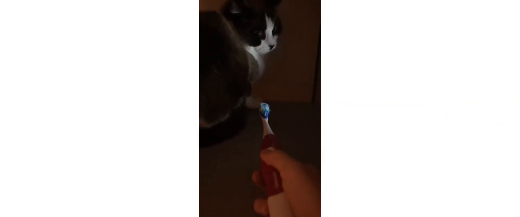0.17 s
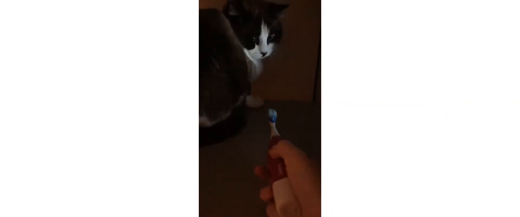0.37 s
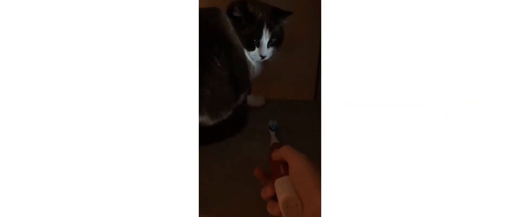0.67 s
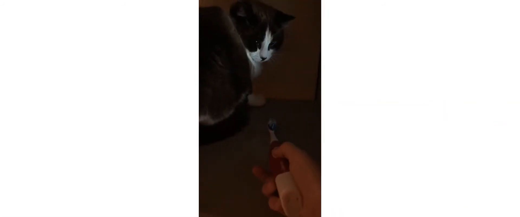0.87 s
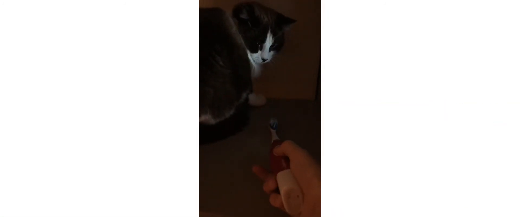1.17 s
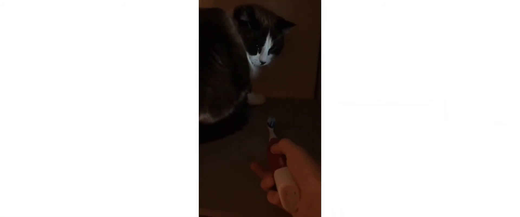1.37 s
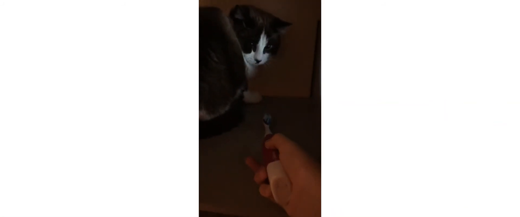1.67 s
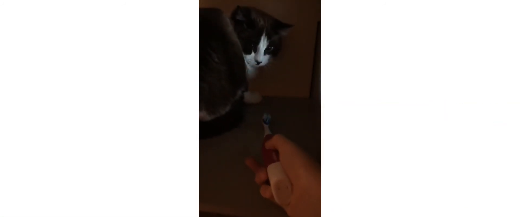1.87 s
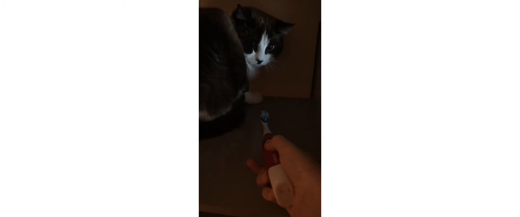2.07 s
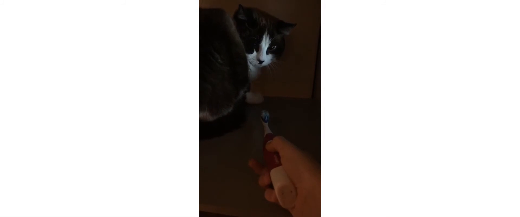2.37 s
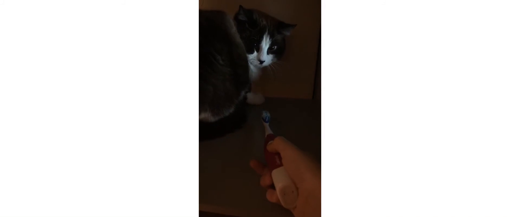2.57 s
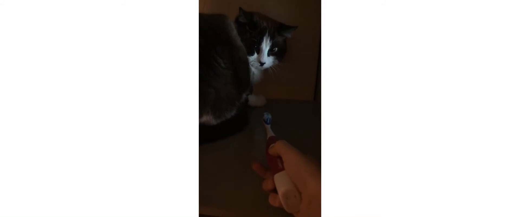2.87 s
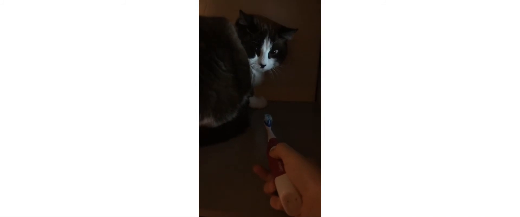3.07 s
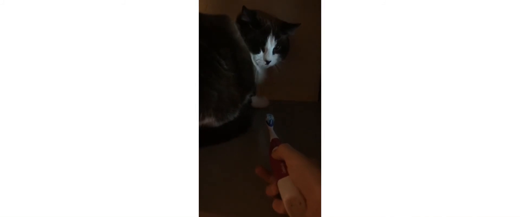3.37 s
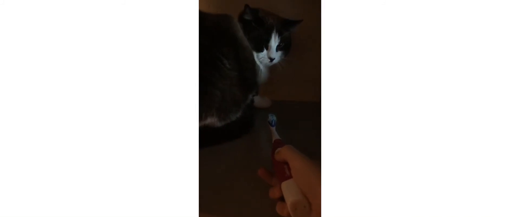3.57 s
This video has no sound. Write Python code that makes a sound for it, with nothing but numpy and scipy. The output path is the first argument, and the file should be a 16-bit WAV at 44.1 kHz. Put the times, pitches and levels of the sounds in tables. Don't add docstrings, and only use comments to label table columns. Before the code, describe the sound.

An electric toothbrush is running from 0 to about 3.7 seconds without stopping. Hard plastic knocks, about 57 swings a second, fuse into a bright, raspy buzz with gritty gear noise and motor whirr, with little bass. Tone shifts as the hand turns it, mostly in the first half second, with a brief dip near 0.4; then it grows very slightly quieter. Faint mains hum and low air lie beneath, in a dry, quiet room.

```python
import sys
import numpy as np
from scipy import signal
from scipy.fft import rfft, irfft
from scipy.io import wavfile
from scipy.ndimage import uniform_filter1d

SR = 44100
rng = np.random.default_rng(int(sys.argv[2]) if len(sys.argv) > 2 else 0)


def decibels_to_gain(level_db):
    exponent = np.asarray(level_db, float) / 20
    return 10 ** exponent


def unload_wav(signal):
    wavfile.write(
        sys.argv[1],
        SR,
        np.round(np.clip(np.atleast_2d(signal).T, -1, 1) * 32767).astype(np.int16),
    )


N = 164052

# (time [s], rate [swings/s])
CRANK_RATE = [(0, 56.838), (.62, 56.849), (1.24, 57.103), (1.86, 56.739), (2.48, 56.598), (3.1, 56.358),
              (3.72, 56.384)]
# (time [s], level [dB], turned away [0-1], head band [dB])
HAND_POSE = [(0, -32.5, 0.3, -2.5), (.2, -31, 0.94, -6.5), (.37, -33.5, 0.2, 0.5), (.42, -32.5, 0, 1.5),
             (.48, -33, 0.16, 0), (.9, -34, 0, 0), (1.3, -33, 0.34, 0.5), (1.75, -34.5, .3, 0.5),
             (2.0, -34, 0.9, 1), (2.4, -34, .8, -0.5), (2.8, -35, 0.76, 0.5), (3.2, -34, 1.05, -1),
             (3.5, -34, .95, 2), (3.72, -34, .95, 0.7)]
# (place [turns], level [dB], tilt [dB/octave], timing spread [turns], scatter [dB])
KNOCKS = [
    (-.022, 1, -.8, .005, 1.2),
    (.03, -11, 3, .012, 2),
    (.09, -5.5, -4, .012, 1.5),
    (.405, -5.5, 1.5, .007, 2),
    (.47, -10.5, 1, .012, 2),
    (.89, -8.5, 3.6, .013, 2.5),
    (.68, -17, -6, .02, 2.5),
]
# (frequency [Hz], density [dB/Hz])
CRACK_SPECTRUM = [(1700, -15.5), (3000, -12.5), (4800, 0), (7000, 4), (7700, -1), (12400, -1.5),
                  (13100, -8), (15750, -7)]
# (frequency [Hz], density [dB/Hz])
GRIND_SPECTRUM = [(1200, -17.5), (3000, -11.5), (4800, -2), (7100, -2), (7700, -8.5), (12500, -10.5),
                  (13000, -15.5), (15750, -13.5)]
# (frequency [Hz], density [dB/Hz])
AIR_SPECTRUM = [(30, -36), (48, -21), (70, -1.5), (100, -3), (200, -10.5), (400, -11.5), (800, -9),
                (1200, -7)]
# (frequency [Hz], ..)
SHELL_HZ = (1765, 2375, 3680, 4235, 4760, 5570, 6560, 8060, 8810, 9830, 10450, 12350, 15100)
# (width [Hz], level [dB])
SHELL_WIDTH_DB = [(70, -8), (107, -7), (222, -1.5), (228, 1), (278, 1), (313, -3), (152, -4), (100, -8),
                  (160, -5), (220, -4), (200, -9.5), (495, -9), (700, -16)]
# (frequency [Hz], width [Hz], level [dB])
HANDLE_MODES = [(1153, 11, -26.5), (1326, 153, -8.5), (1746, 110, -1), (2240, 200, -4), (2394, 120, 0.5),
                (2840, 1450, -5)]
# (low edge [Hz], high edge [Hz], change [dB])
TURNING_BANDS = [(1600, 1900, -2), (2050, 2270, 2.5), (2280, 2550, -7), (13000, 19000, -6.5)]
# (low edge [Hz], high edge [Hz])
HEAD_BAND_HZ = (3400, 5200)
# (multiple of the swing rate [-], level [dB])
SHAKE = [(1, -71), (2, -84), (3, -77), (5, -80), (6, -81), (10, -77), (11, -76.5), (13, -75), (17, -76),
         (20.45, -72), (23, -71), (30, -66), (31, -64)]
# (time [s], shaft hum [dB], commutator whine [dB])
MOTOR_DB = [(0, -95, -70.5), (.6, -96, -72), (.9, -74.5, -69), (2.0, -68, -68), (2.25, -101, -66),
            (2.7, -72, -68), (3.72, -74.5, -65.5)]
# (time [s], level [dB])
MAINS_DB = [(0, -69), (.25, -63), (.4, -63.5), (1.0, -59.5), (1.5, -62), (2.4, -58), (3.0, -68),
            (3.72, -78)]
# (multiple of mains [-], level [dB], wobble [dB])
MAINS_PARTIALS = [(2 / 3, -79, 1), (2, -79, 3.5), (2.96, -73, 3)]


def level(x, db):
    return x * decibels_to_gain(db) / np.sqrt(np.mean(x ** 2))


def curve(table, col):
    rows = np.array(table, float)
    return np.interp(np.arange(N) / SR, rows[:, 0], rows[:, col])


def colour(x, points):
    p = np.array(points, float)
    hz = np.maximum(np.arange(1025) * SR / 2048, 1)
    db = np.interp(np.log(hz), np.log(p[:, 0]), p[:, 1])
    db = db - 18 * np.maximum(np.log2(p[0, 0] / hz), 0)
    cepstrum = irfft(np.log(decibels_to_gain(db)))
    cepstrum[1:1024] *= 2
    cepstrum[1025:] = 0
    return signal.fftconvolve(x, irfft(np.exp(rfft(cepstrum))))[:N]


def ring(x, hz, width_hz):
    return signal.lfilter(*signal.iirpeak(hz, hz / width_hz, fs=SR), x)


def decay(x, time_s):
    return signal.lfilter([1], [1, -np.exp(-1 / (time_s * SR))], x)


def walk(rate_hz):
    k = int(SR / rate_hz)
    steps = np.repeat(rng.standard_normal(N // k + 1), k)
    return 1.3 * uniform_filter1d(uniform_filter1d(steps, k), k)[:N]


def tone(turns, db, wobble_db):
    return decibels_to_gain(db + wobble_db * walk(12)) * np.sqrt(2) * np.sin(2 * np.pi * turns)


def slack_impacts(turns):
    slack_s, slack_length_s, slack_db = .42, .016, -9
    low_tilt_octaves, mode_scatter_db = .3, 1.5
    place, db, tilt, spread, scatter = np.array(KNOCKS).T
    swings = np.arange(-1, turns[-1] + 1)[:, None]
    draws = rng.standard_normal((len(swings), len(place), 4 + len(SHELL_HZ)))
    luck = 2.2 * np.tanh(draws / 2)
    knock_turns = swings + place + spread * luck[..., 0]
    at = np.interp(knock_turns, turns, np.arange(N), left=N, right=N).astype(int)
    dip = np.exp(-((at / SR - slack_s) / slack_length_s) ** 2)
    size_db = db + scatter * luck[..., 1] + slack_db * dip

    def train(hz, draw):
        octaves = max(np.log2(hz / 5500), -low_tilt_octaves)
        knock_db = size_db + tilt * octaves + mode_scatter_db * luck[..., draw]
        return np.bincount(at.ravel(), decibels_to_gain(knock_db).ravel(), N + 1)[:N]

    return train


def knocks(train):
    contact_s, damping = .00018, 2.0
    rings = np.zeros(N)
    for k, (hz, (width_hz, db)) in enumerate(zip(SHELL_HZ, SHELL_WIDTH_DB)):
        rings += (-1) ** k * decibels_to_gain(db) * ring(train(hz, 4 + k), hz, damping * width_hz)
    burst = np.sign(rng.standard_normal(N))
    low_touch = decay(decay(train(3400, 2), contact_s), contact_s)
    high_touch = decay(decay(train(12800, 3), contact_s), contact_s)
    crack = signal.lfilter(*signal.butter(2, 7500, fs=SR), burst * low_touch)
    crack = crack + signal.lfilter(*signal.butter(2, 7500, "high", fs=SR), burst * high_touch)
    return level(rings, -5.5) + level(colour(crack, CRACK_SPECTRUM), -4)


def gears(train):
    grain_db, rattle_db, rattle_s = 2, 4, .004
    grit = rng.standard_normal(N) * decibels_to_gain(grain_db * rng.exponential(size=N))
    grit = grit * (1 + decibels_to_gain(rattle_db) * decay(train(5500, 1), rattle_s))
    shell = np.zeros(N)
    for hz, (width_hz, db) in zip(SHELL_HZ, SHELL_WIDTH_DB):
        shell += decibels_to_gain(db) * ring(ring(grit, hz, 1.8 * width_hz), hz, 1.8 * width_hz)
    return level(colour(grit, GRIND_SPECTRUM), -3.5) + level(shell, -8)


def motor_whirr():
    whirr = sum(decibels_to_gain(db) * ring(rng.standard_normal(N), hz, width_hz) for hz, width_hz, db in HANDLE_MODES)
    return level(whirr, -13.5)


def held(x):
    def band(low_hz, high_hz):
        return signal.sosfiltfilt(signal.butter(2, (low_hz, high_hz), "band", fs=SR, output="sos"), x)

    away = curve(HAND_POSE, 2) - .5
    out = x + band(*HEAD_BAND_HZ) * (decibels_to_gain(curve(HAND_POSE, 3)) - 1)
    for low_hz, high_hz, db in TURNING_BANDS:
        out = out + band(low_hz, high_hz) * (decibels_to_gain(db * away) - 1)
    bass_cut = signal.ellip(5, 1, 22, 1130, "high", fs=SR, output="sos")
    return signal.sosfilt(bass_cut, out) * decibels_to_gain(curve(HAND_POSE, 1) + 1.5)


def room(brush):
    t60_s, tail_db, gap_s = .12, -16, .003
    s = np.arange(SR // 4) / SR
    tail = rng.standard_normal(len(s)) * decibels_to_gain(-60 * s / t60_s) * (s > gap_s)
    wet = signal.fftconvolve(brush, tail / np.sqrt(np.sum(tail ** 2)))[:N]
    return brush + decibels_to_gain(tail_db) * wet


def handle_shake(turns):
    return sum(tone(k * turns + rng.random(), db, wobble_db=2) for k, db in SHAKE)


def motor_tones(turns):
    shaft_ratio, pole_ratio = 2.915, 8.735
    shaft = tone(shaft_ratio * turns, curve(MOTOR_DB, 1), wobble_db=2)
    return shaft + tone(pole_ratio * turns, curve(MOTOR_DB, 2), wobble_db=.8)


def mains_hum():
    cycles = 59.85 * np.arange(N) / SR
    hum = tone(cycles, curve(MAINS_DB, 1), wobble_db=.4)
    return hum + sum(tone(k * cycles, db, wobble_db) for k, db, wobble_db in MAINS_PARTIALS)


def air():
    x = signal.sosfilt(signal.butter(2, 1500, fs=SR, output="sos"), rng.standard_normal(N))
    return level(colour(x, AIR_SPECTRUM), -58.5) * decibels_to_gain(1.8 * walk(2.92))


def scene():
    first_turn = .105
    turns = first_turn + np.cumsum(curve(CRANK_RATE, 1)) / SR
    train = slack_impacts(turns)
    brush = held(knocks(train) + gears(train) + motor_whirr())
    background = handle_shake(turns) + motor_tones(turns) + mains_hum() + air()
    return (room(brush) + background)[None]


def band_limit(x):
    return signal.sosfilt(signal.butter(12, 17070, fs=SR, output="sos"), x)


def record(dry):
    top_cut = signal.ellip(12, .3, 75, 15800, fs=SR, output="sos")
    mix = signal.sosfilt(top_cut, dry)
    return band_limit(mix)


dry = scene()
out = record(dry)
unload_wav(out)
```